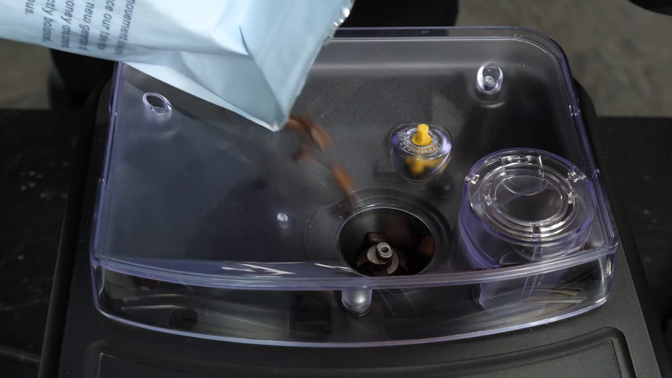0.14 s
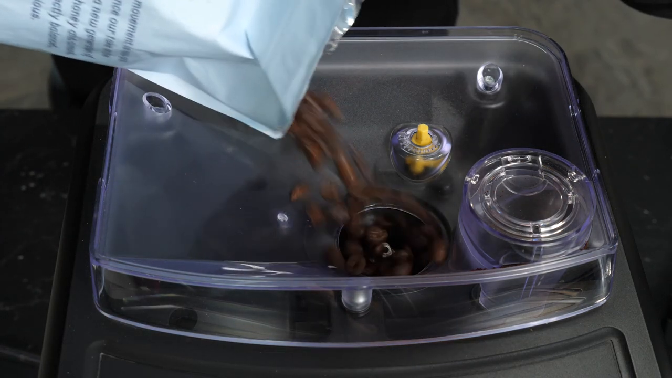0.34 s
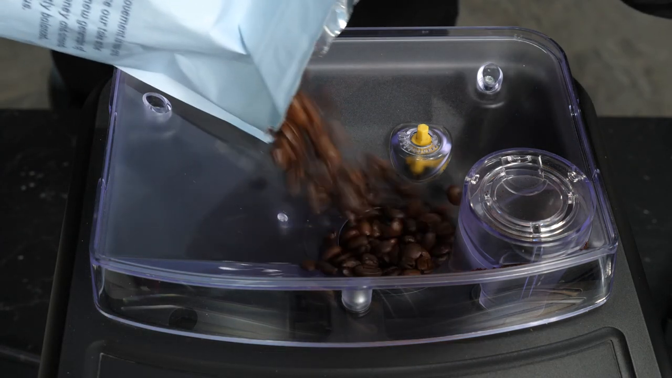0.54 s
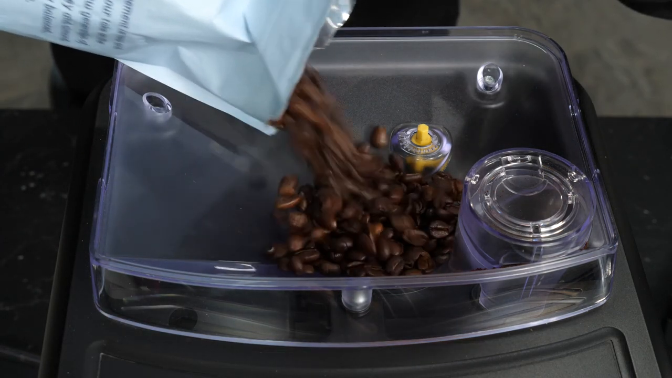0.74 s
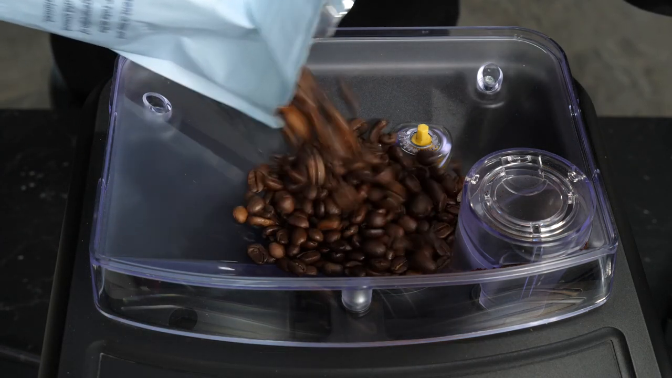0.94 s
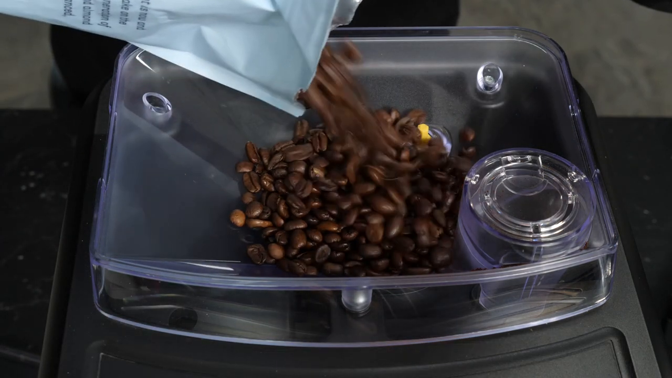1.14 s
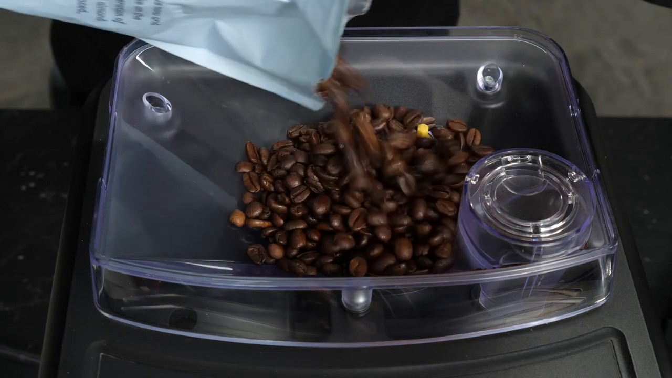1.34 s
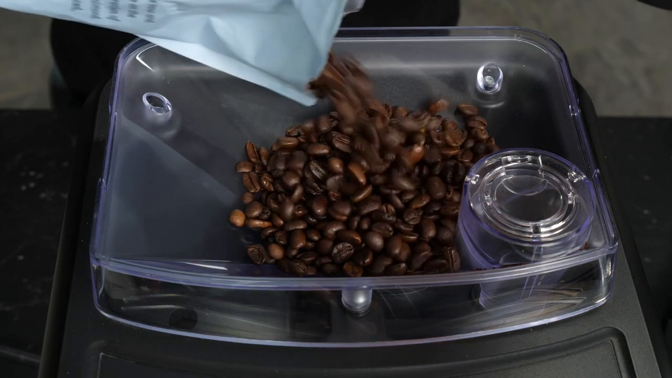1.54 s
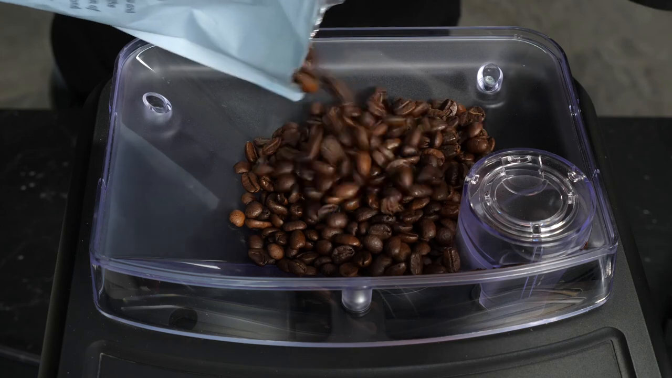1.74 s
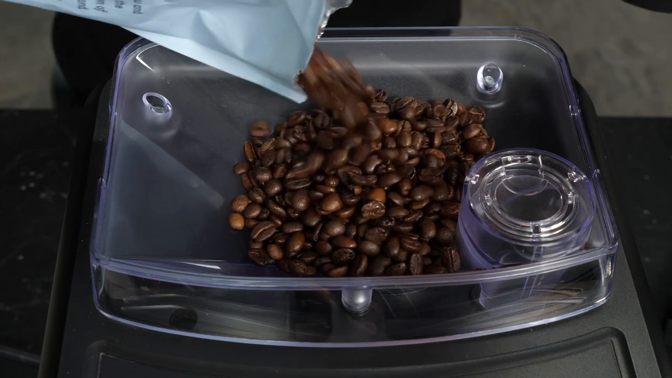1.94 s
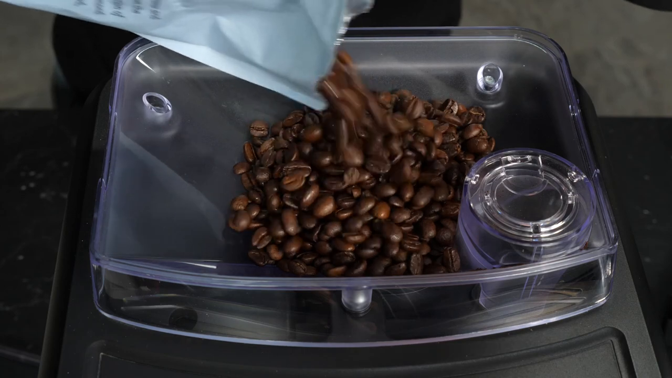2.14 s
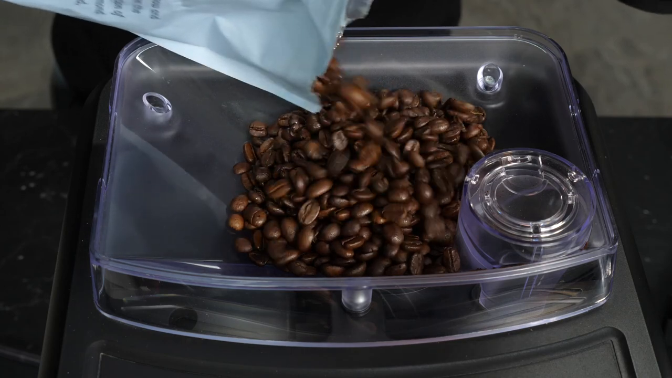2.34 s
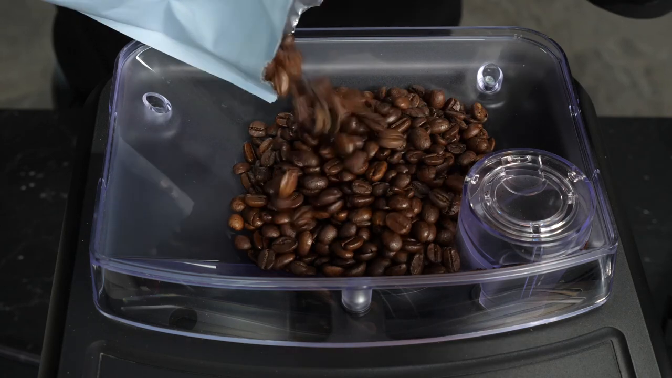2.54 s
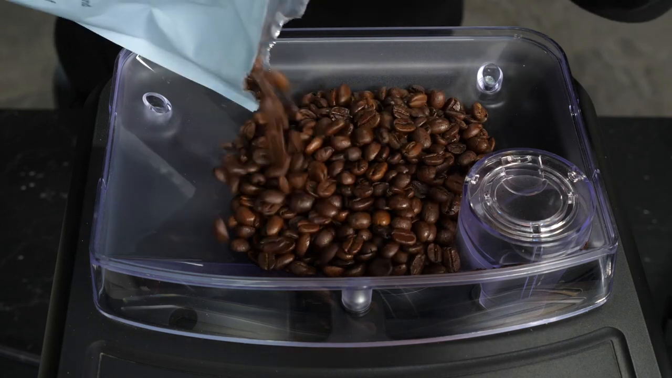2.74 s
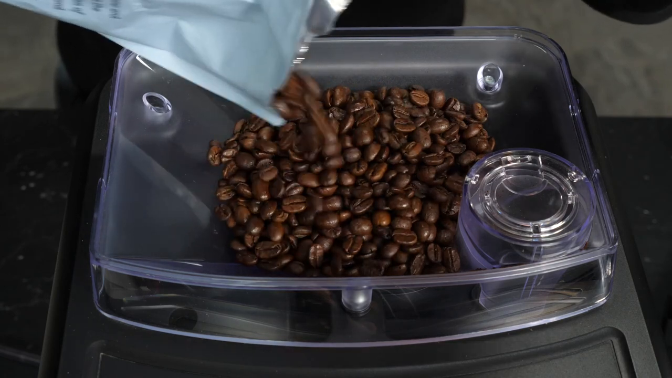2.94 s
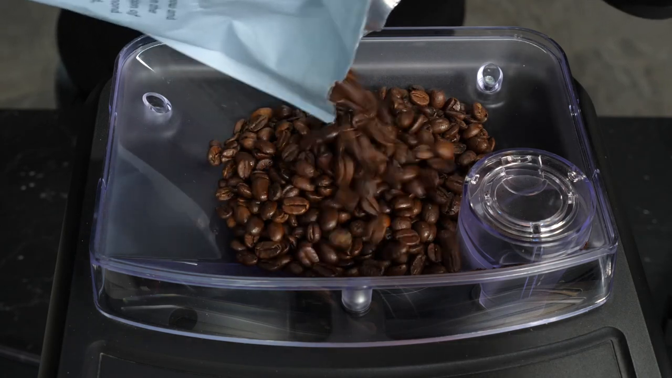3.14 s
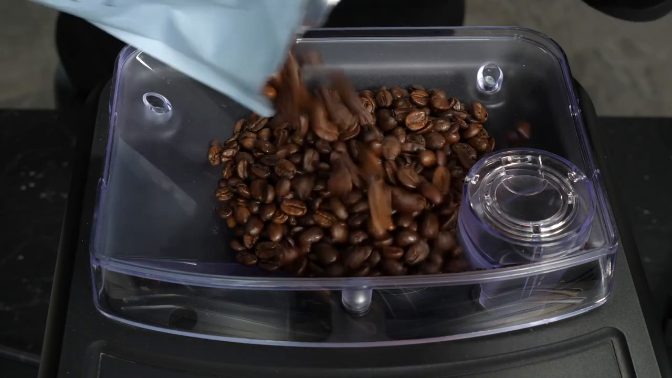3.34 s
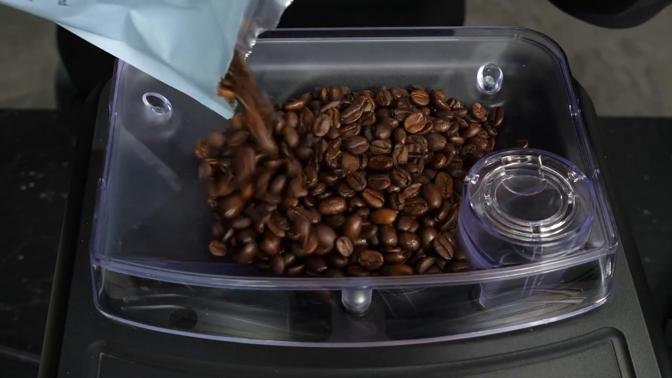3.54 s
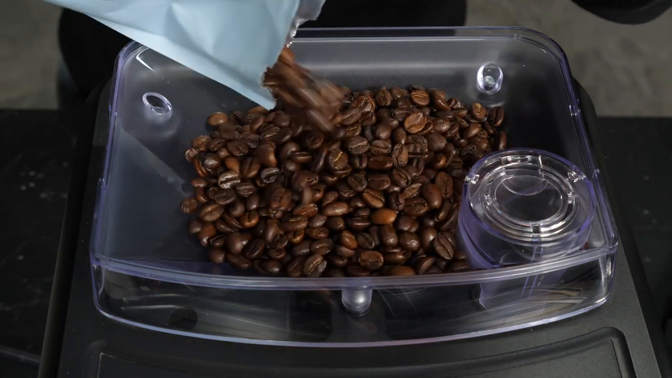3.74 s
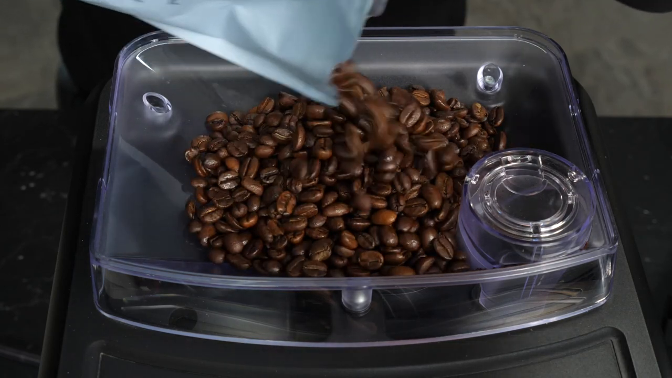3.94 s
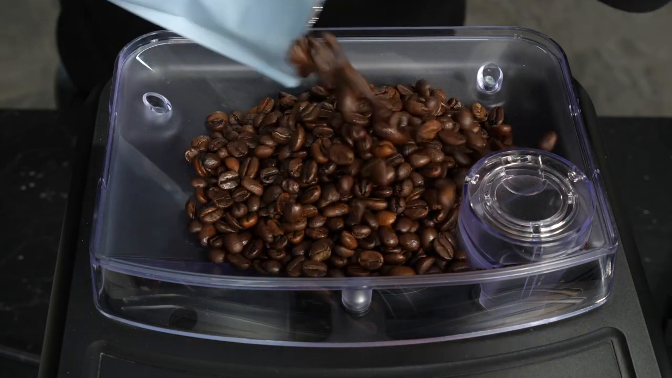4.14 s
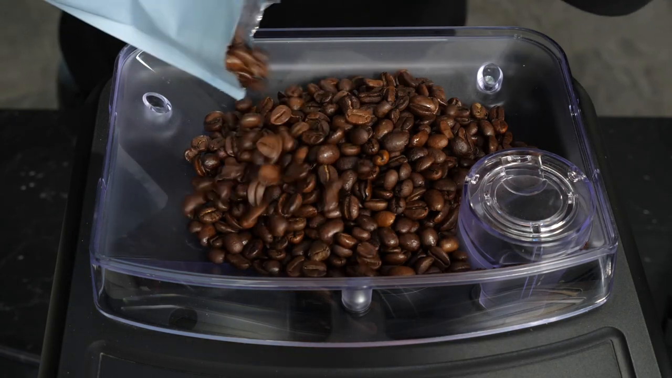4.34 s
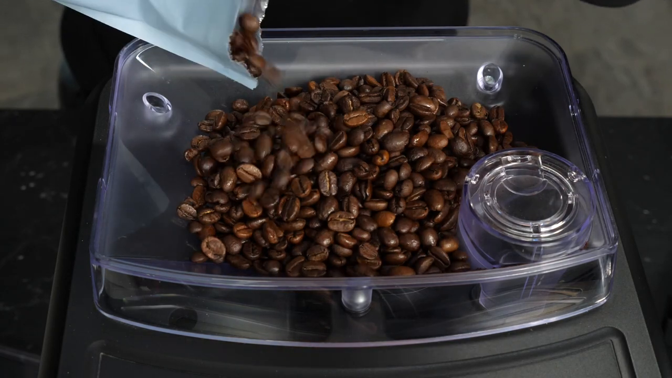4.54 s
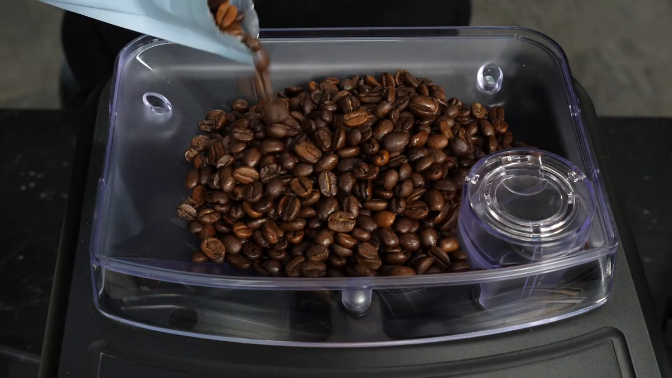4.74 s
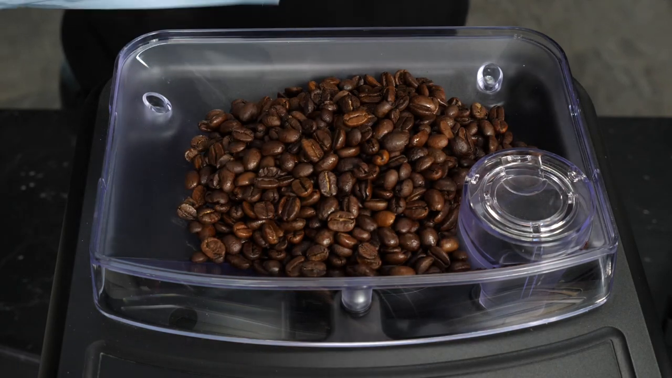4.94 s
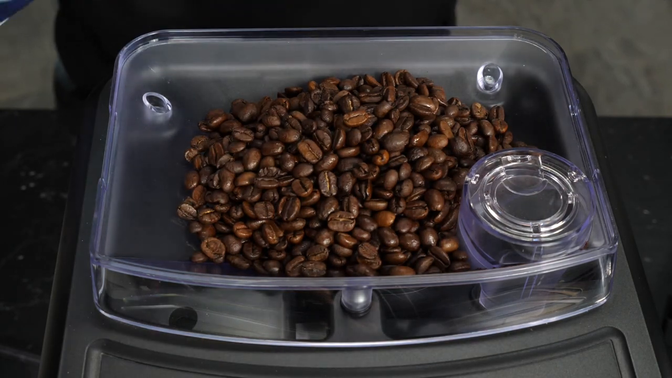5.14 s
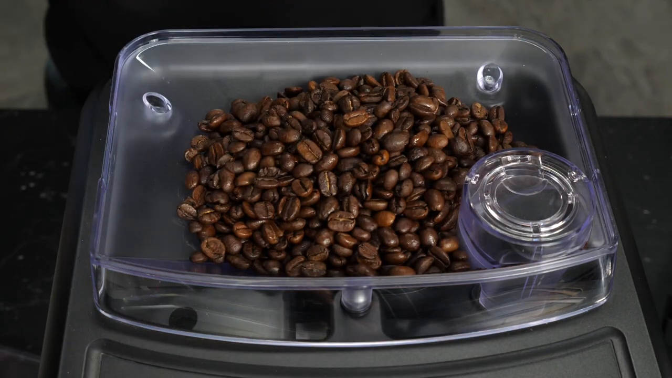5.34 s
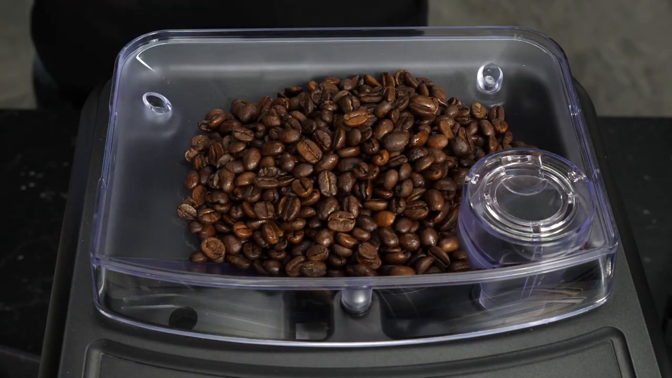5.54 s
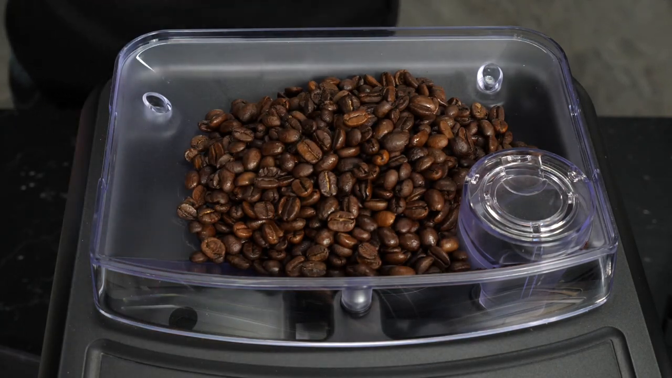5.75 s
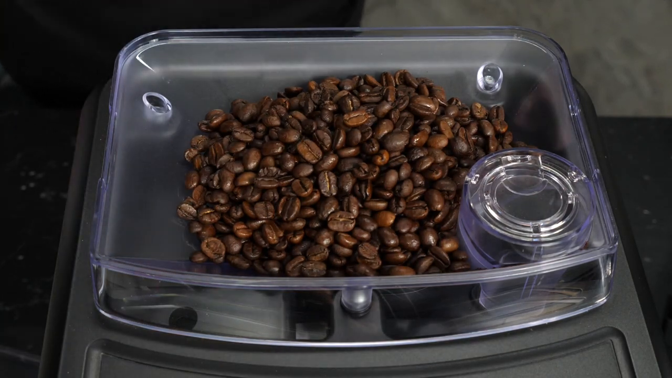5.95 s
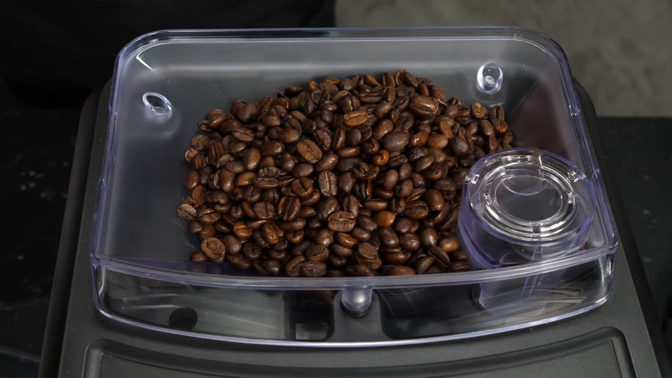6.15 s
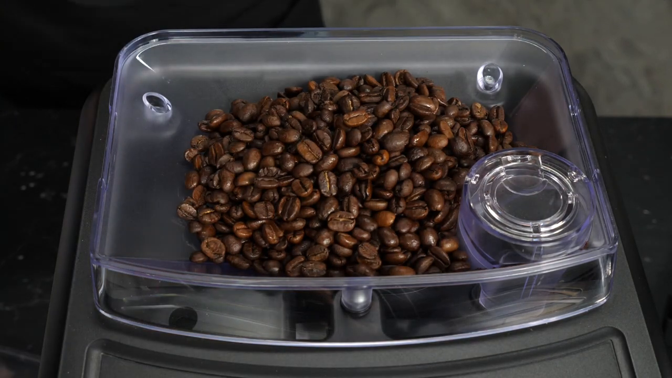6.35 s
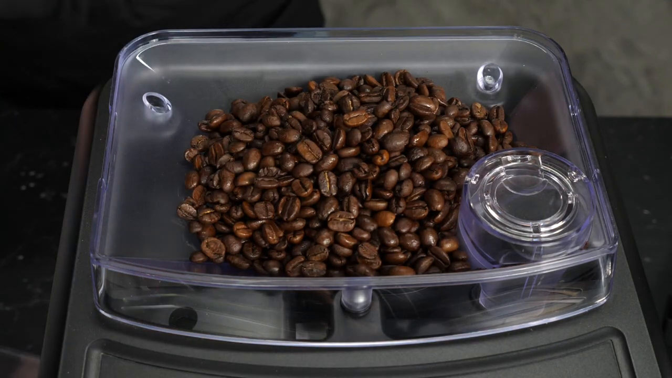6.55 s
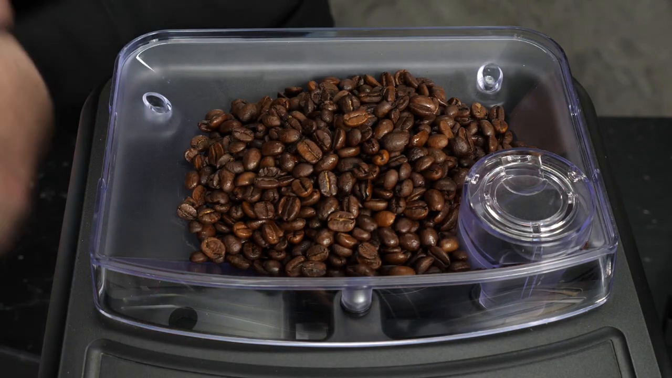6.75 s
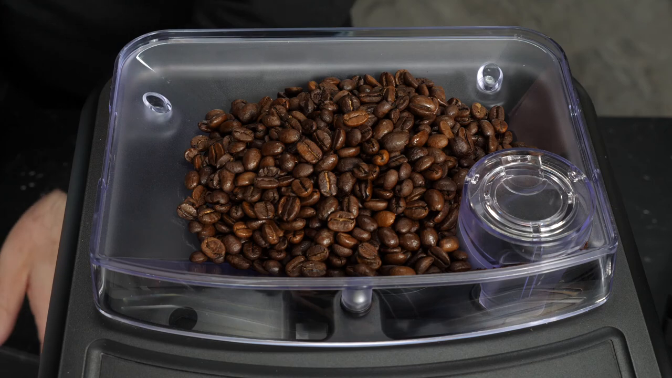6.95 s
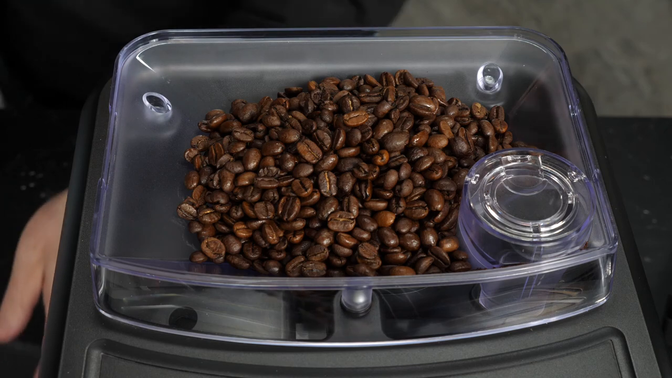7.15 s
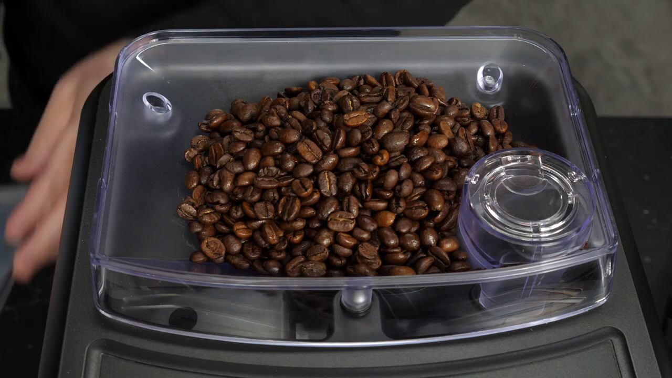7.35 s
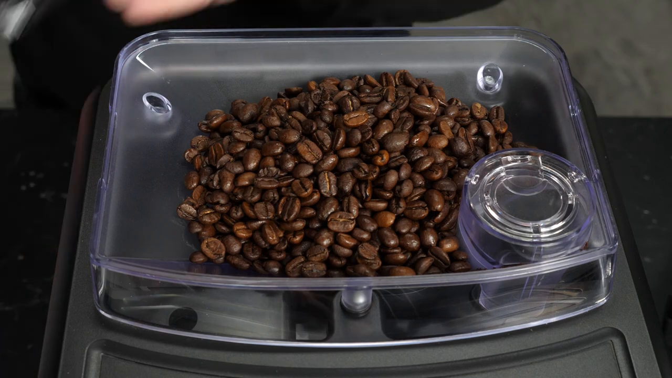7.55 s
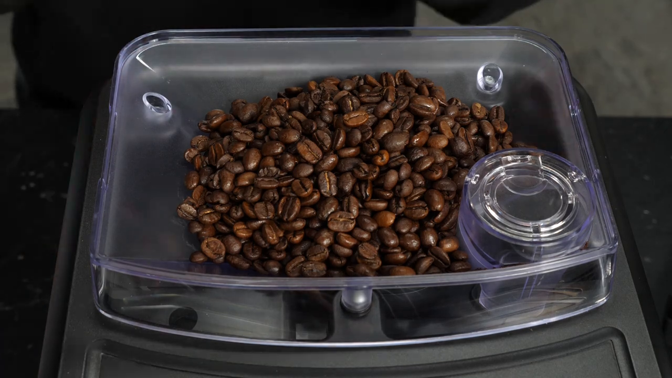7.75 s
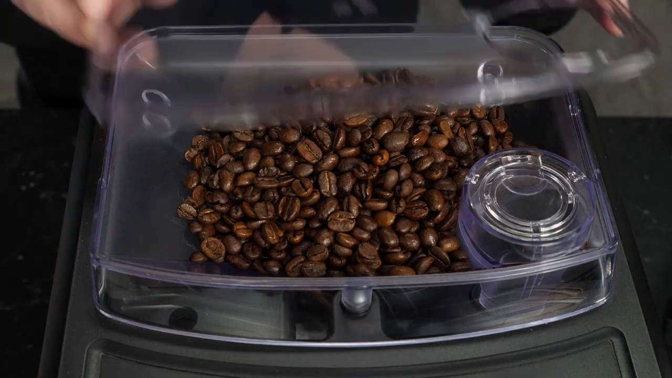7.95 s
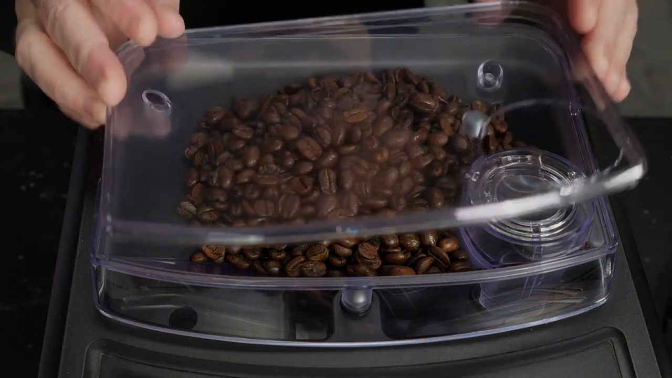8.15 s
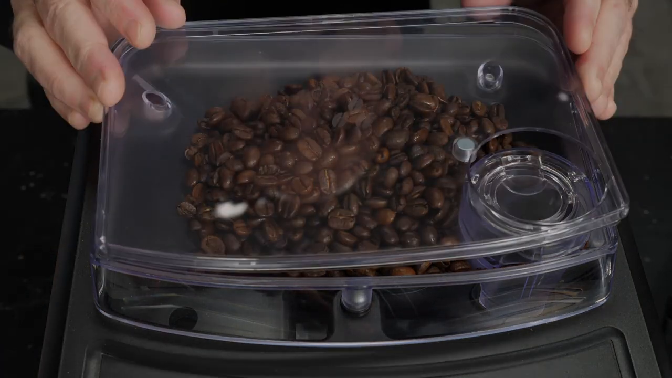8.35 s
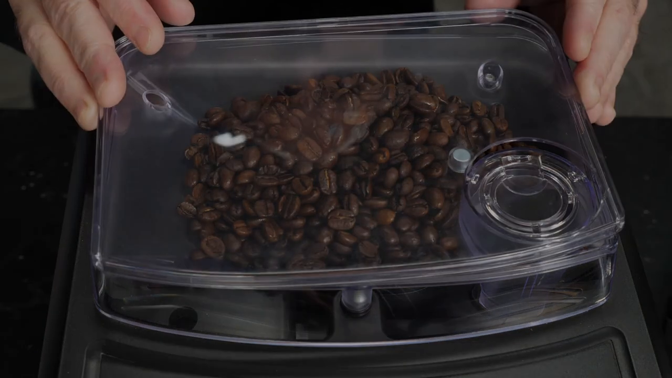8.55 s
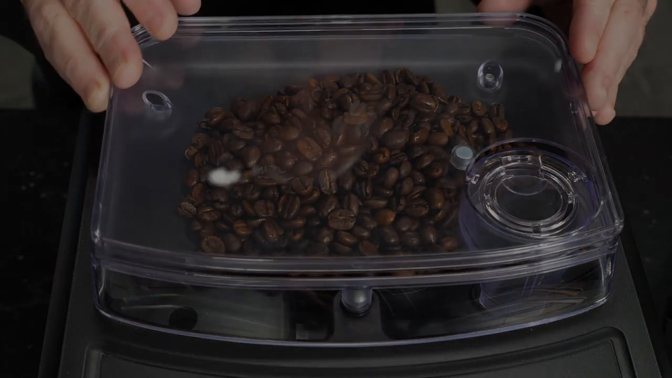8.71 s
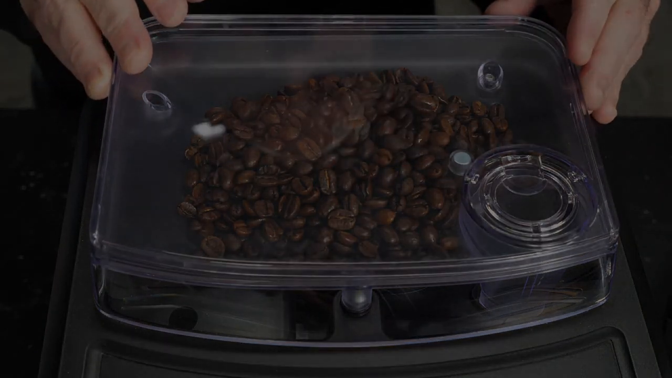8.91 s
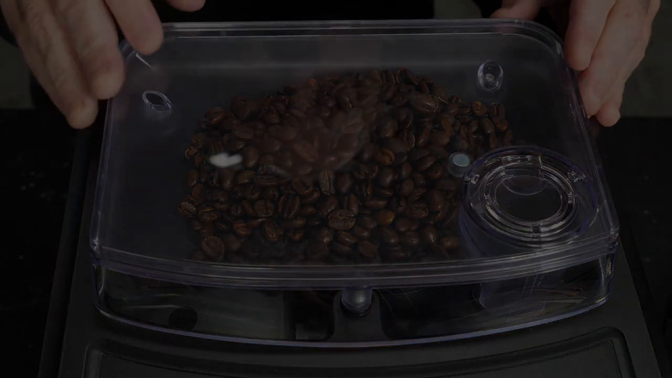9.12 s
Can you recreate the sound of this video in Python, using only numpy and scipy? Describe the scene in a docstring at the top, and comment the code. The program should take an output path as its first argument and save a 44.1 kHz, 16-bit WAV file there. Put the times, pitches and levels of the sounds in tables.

```python
"""Roasted coffee beans pour from a foil bag into a plastic hopper, close by in a quiet kitchen.
Random blows excite filtered noise splinters for heap thuds, shell ticks and wall rattle; some beans ring the hopper.
The stream thins to single ticks; the bag is tipped upright, its beans slump back crackling and it is set down.
A plastic lid is dragged off the counter in stick-slip grains and seated on the hopper with a few knocks.
Below lie a low shake of the machine and steady noise of kitchen air and microphone hiss."""
import sys
import numpy as np
from scipy import signal
from scipy.io import wavfile
from scipy.ndimage import uniform_filter1d

SR = 44100
rng = np.random.default_rng(int(sys.argv[2]) if len(sys.argv) > 2 else 0)


def put_to_file(sound):
    """Save the sound as 16-bit audio at rate SR, in the file named by the first command-line argument."""
    columns = np.atleast_2d(sound).T  # one column per channel
    safe = np.clip(columns, -1, 1)
    whole_steps = np.round(safe * 32767)
    wavfile.write(sys.argv[1], SR, whole_steps.astype(np.int16))


N = 409248  # samples

# crack of foil and plastic: (frequency [Hz], level [dB])
CRACK_SPECTRUM = [(1500, -15), (2600, -0.5), (3300, -0.5), (4100, 1.5), (5500, -4), (7500, -10.5),
                  (9500, -35.5)]
# fine crackle of foil and plastic: (frequency [Hz], level [dB])
FINE_SPECTRUM = [(6000, -19), (8000, -4), (10000, -6.5), (12200, -1.1), (14000, -4.5)]
# lid on the rim of the hopper: (frequency [Hz], level [dB])
SEAT_SPECTRUM = [(59, -42), (100, -25), (195, -8.5), (263, 8), (376, -11), (645, -4), (845, -11),
                 (1000, -10), (1390, -7.5), (1560, -16), (1720, -15.5), (3000, -29.5), (3900, -59),
                 (6600, -120)]


def amp(db):
    """Gain of a level in dB."""
    return 10 ** (np.asarray(db) / 20)


def evened(x):
    """Scaled to rms 1."""
    return x / np.sqrt(np.mean(x ** 2) + 1e-20)


def along(rows, column):
    """One column of a curve at every sample; -150 dB outside it."""
    rows = np.array(rows)
    return np.interp(np.arange(N) / SR, rows[:, 0], rows[:, column], left=-150, right=-150)


def colour(points, size=4096):
    """Causal impulse response of a spectrum: the phase is the Hilbert transform of the log gain."""
    point_hz, point_db = np.transpose(points)
    hz = abs(np.fft.fftfreq(size, 1 / SR))
    gain_db = np.interp(np.log(hz + 1), np.log(point_hz + 1), point_db, left=-70, right=-70)
    log_gain = gain_db * np.log(10) / 20
    response = np.fft.ifft(np.exp(np.conj(signal.hilbert(log_gain)))).real
    return response[:size // 2]


def through(x, points):
    """x coloured by a spectrum."""
    return signal.oaconvolve(x, colour(points))[:len(x)]


def burst(ms):
    """A splinter of noise dying with time constant ms."""
    t = np.arange(1500) / SR
    return rng.standard_normal(len(t)) * np.exp(-1000 * t / ms)


def impacts(per_s, spread_db):
    """Sparse blows at random moments; most are small, a few large."""
    size_db = spread_db * np.minimum(rng.exponential(1, N), 3.5)
    return amp(size_db) * (rng.random(N) < per_s / SR)


def grains(blows, points, ms, bed_db, count=12, stretch=0.044):
    """Every blow lands on one of several spots, each with its own splinter and tuning; far blows blur into a bed."""
    spot = rng.integers(0, count, N)
    tuning = np.exp(stretch * rng.uniform(-1.03, 1, count))
    near = np.zeros(N)
    for k in range(count):
        splinter = evened(through(burst(ms), np.multiply(points, [tuning[k], 1])))
        near += signal.oaconvolve(blows * (spot == k), splinter)[:N]
    bed = evened(through(rng.standard_normal(N), points))
    return evened(evened(near) + amp(bed_db) * bed)


def surges(depth_db, ms):
    """Beans come in clumps: a random gain that wanders within about ms."""
    width = max(int(ms * SR / 1000), 2)
    return amp(depth_db * evened(uniform_filter1d(rng.standard_normal(N), width)))


def swells(rows, column, rise_db, fall_db_per_s):
    """Gain curve of events that climb by rise_db, hold and die away at a steady rate."""
    t, out = np.arange(N) / SR, np.zeros(N)
    for row in rows:
        start, rise_s, hold_s = row[:3]
        top = start + rise_s
        below_db = rise_db * np.maximum(top - t, 0) / rise_s
        below_db += fall_db_per_s * np.maximum(t - top - hold_s, 0)
        out += amp(row[column] - below_db) * (t >= start)
    return out


def add(mix, s, db, sound):
    """Lays a sound into mix at a peak level, starting a fixed short lag after its listed time."""
    lag_s = .0013
    part = mix[round((s + lag_s) * SR):][:len(sound)]
    part += amp(db) * sound[:len(part)] / abs(sound).max()


def rings(rows, rise_ms, overtone, overtone_db):
    """One damped note a row, with an overtone at a given multiple."""
    out, t = np.zeros(N), np.arange(5000) / SR
    for s, db, hz, t60 in rows:
        note = np.sin(2 * np.pi * hz * t)
        note += amp(overtone_db) * np.sin(2 * np.pi * (overtone * hz * t + rng.random()))
        add(out, s, db, note * (1 - np.exp(-1000 * t / rise_ms)) * amp(-60 * t / t60))
    return out


def bounced(x, ms, db):
    """A bean hits, hops and hits again more softly."""
    return x + amp(db) * np.roll(x, int(ms * SR / 1000))


def hits(rows, body, edge, snap, push_db, push_hz, push_ms):
    """Each blow is a snap and a burst in the body, a shorter crack and edge, and a low push through the counter."""
    out, t = np.zeros(N), np.arange(6000) / SR
    sag = 1 + 1.3 * np.exp(-t / 0.0068)  # the push starts quick and slows to push_hz
    push = np.sin(2 * np.pi * push_hz * np.cumsum(sag) / SR) * np.exp(-1000 * t / push_ms)
    for s, body_db, crack_db, edge_db, ms in rows:
        add(out, s, body_db, signal.oaconvolve(burst(ms) + snap * burst(0.21), body))
        add(out, s, crack_db, through(burst(.5 * ms) + snap * burst(0.14), CRACK_SPECTRUM))
        add(out, s, edge_db, through(burst(0.56 * ms), edge))
        add(out, s, body_db + push_db, push)
    return out


def kitchen_air():
    """Steady coloured noise of kitchen air and microphone hiss."""
    # (frequency [Hz], level [dB])
    air_spectrum = [(8.8, -53.5), (15, -1), (30, -13), (48, -17), (70, -7.5), (125, -4.5), (144, -12.5),
                    (320, -18), (359, -17), (439, -23), (655, -25.5), (848, -26), (2060, -35),
                    (8610, -39.5), (14000, -38)]
    return amp(-65) * evened(through(rng.standard_normal(N), air_spectrum))


def machine_shake():
    """The body of the machine shakes under the stream and the bag: low noise on a level curve."""
    # (time [s], level [dB])
    shake_levels = [(0.0, -70), (0.15, -46.5), (1.67, -50.5), (4.4, -52.5), (4.91, -59.5), (6.23, -52),
                    (6.35, -67), (6.6, -66)]
    # (frequency [Hz], level [dB])
    rumble_spectrum = [(7.1, -35.5), (12, 10), (38, 0.5), (91, -20), (150, -19), (200, -44), (330, -120)]
    return evened(through(rng.standard_normal(N), rumble_spectrum)) * amp(along(shake_levels, 1))


def kitchen(x):
    """Room reverberation from sparse taps of random sign; the treble dies sooner."""
    size = SR // 2
    taps = np.zeros(size)
    at = np.arange(200, size - 20, 20)
    taps[at + rng.integers(0, 20, len(at))] = rng.choice([-1., 1.], len(at))
    hz, t, z = signal.stft(taps, SR, nperseg=256)
    t60_s = np.interp(hz, [300, 2000, 12000], [.35, .25, .12])[:, None]
    tail = signal.istft(z * amp(-60 * t / t60_s), SR, nperseg=256)[1]
    return signal.fftconvolve(x, tail / np.linalg.norm(tail))[:N]


def lid_modes():
    """Impulse response of the lid: a sum of damped sines."""
    # (frequency [Hz], level [dB], t60 [s])
    mode_rows = [(265, -5.5, .07), (470, -2, 0.038), (832, 0.5, 0.053), (1380, -8, 0.027),
                 (1650, -10, 0.035)]
    t = np.arange(4000) / SR
    return sum(amp(db - 60 * t / t60) * np.sin(2 * np.pi * hz * t) for hz, db, t60 in mode_rows)


def lid_rubs():
    """Stick-slip grains excite the lid, first on the counter, then on the rim, where its modes ring."""
    # (start [s], rise [s], hold [s], ring [dB], scrape [dB], fine hiss [dB])
    rub_rows = [(7.01, 0.03, .002, -46.5, -60, -68), (7.148, 0.014, 0.052, -54, -73, -76),
                (7.25, 0.02, 0.032, -62.5, -68, -66.5), (8.234, 0.0041, 0.0018, -48.5, -82, -90),
                (8.395, .003, 0.037, -49.5, -67, -83), (8.462, 0.0046, 0.0097, -34.5, -49, -61),
                (8.65, 0.026, 0.033, -57, -93, -93), (8.79, 0.032, .002, -43.5, -58, -61),
                (8.97, 0.07, .002, -45, -58, -67)]
    # lid on the counter: (frequency [Hz], level [dB])
    drag_spectrum = [(88, -46.5), (150, -3), (274, -17.5), (389, -29), (512, -1), (710, -13), (1170, -3),
                     (2060, -14), (2580, -28), (3000, -18.5), (3900, -29), (6600, -120)]
    on_rim_s, rise_db, ring_fall_db_per_s, hiss_fall_db_per_s = 8, 20.5, 320.0, 448
    slips = impacts(1800, spread_db=5.5)
    ring_gain = swells(rub_rows, 3, rise_db, ring_fall_db_per_s)
    scrape_gain = swells(rub_rows, 4, rise_db, hiss_fall_db_per_s)
    fine_gain = swells(rub_rows, 5, rise_db, hiss_fall_db_per_s)
    drag = grains(slips, drag_spectrum, ms=1.3, bed_db=-1.5)
    seat = grains(slips, SEAT_SPECTRUM, ms=4.0, bed_db=-2.5)
    seat += 0.83 * evened(signal.oaconvolve(slips - slips.mean(), lid_modes())[:N])
    ring = ring_gain * np.where(np.arange(N) < on_rim_s * SR, drag, evened(seat))
    scrape = grains(slips, CRACK_SPECTRUM, ms=1.0, bed_db=-5.0) * scrape_gain
    fine = grains(slips, FINE_SPECTRUM, ms=.8, bed_db=2.0) * fine_gain
    return ring + scrape + fine


def lid_chirps():
    """The lid chirps as it catches on the counter: short damped notes."""
    # (time [s], peak [dB], pitch [Hz], t60 [s])
    chirp_rows = [(7.037, -37.5, 1157, 0.037), (7.053, -47, 1200, 0.048), (7.206, -46, 1180, 0.053),
                  (7.224, -52, 1190, 0.064), (7.292, -44, 1024, 0.048)]
    return rings(chirp_rows, rise_ms=2.5, overtone=3, overtone_db=-22)


def lid_knocks():
    """The lid knocks: bursts excite the rim colour and the lid modes."""
    # (time [s], body peak [dB], crack peak [dB], sharp edge peak [dB], body burst time constant [ms])
    knock_rows = [(8.208, -44.5, -71, -57, 4.6), (8.234, -34, -54, -75, 2.5), (8.361, -41, -72, -70, 1.8),
                  (8.394, -36.5, -43, -46, 5.7), (8.415, -32.5, -43, -54, 4.9), (8.443, -49, -50, -66, 2.5),
                  (8.463, -24.5, -34, -26, 4.1), (8.502, -27.5, -51, -54, 3.3), (8.522, -32, -62, -64, 2.1),
                  (8.609, -47, -74, -84, 2.2), (8.734, -45.5, -77, -77, 4.3), (8.801, -48, -63, -47, 2.2),
                  (8.821, -29, -35.5, -32, 9.3), (8.975, -53, -64, -53, 2.1), (8.987, -41, -57, -40, 4.6),
                  (9.007, -40, -55, -46, 1.7), (9.029, -27.5, -37, -32, 4.3)]
    # sharp edge of a knock on plastic: (frequency [Hz], level [dB])
    edge_spectrum = [(5000, -29), (6800, 0), (9000, -5), (12300, 1), (14000, -4)]
    modes = lid_modes()
    rim = np.pad(colour(SEAT_SPECTRUM), (0, len(modes)))[:len(modes)]
    body = evened(rim) + 0.65 * evened(modes)
    return hits(knock_rows, body, edge_spectrum, snap=1.9, push_db=-16.5, push_hz=30.6, push_ms=33)


def counter_bumps():
    """The bag, and last the lid, bump the counter: bursts in its body, with a dull edge."""
    # (time [s], body peak [dB], crack peak [dB], edge peak [dB], body burst time constant [ms])
    bump_rows = [(5.297, -42, -21.5, -33, 2.7), (5.755, -23, -34, -61, 3.6), (5.817, -25.5, -35, -45, 2.2),
                 (5.844, -24, -62, -69, 1.6), (5.889, -30, -51, -55, 2), (5.921, -36, -56, -46, 3.6),
                 (5.994, -35, -44, -51, 3.3), (6.02, -21.5, -24, -32.5, 1.8), (6.046, -15.5, -29, -50, 6.3),
                 (6.061, -20.5, -27, -49, 9.1), (6.1135, -27.5, -27, -57.5, 3.4),
                 (6.212, -22.5, -20.5, -38, 2.5), (6.237, -31, -54, -62.5, 1.3),
                 (6.372, -46.5, -70, -80, 4.8), (6.405, -24.5, -26, -42, 10.8),
                 (6.542, -33, -46.5, -67, 3.6), (6.789, -49.5, -81, -65, 3.8),
                 (7.173, -28.5, -42.5, -64, 2.1)]
    # counter body: (frequency [Hz], level [dB])
    counter_spectrum = [(55, -28), (170, -5), (650, 1), (1300, -4.5), (2200, -8), (3200, -37),
                        (5000, -69.5)]
    # edge of a bump: (frequency [Hz], level [dB])
    dull_edge_spectrum = [(5500, -21.5), (7800, -1), (11000, -9), (14000, -10.5)]
    return hits(bump_rows, colour(counter_spectrum), dull_edge_spectrum,
                snap=3.84, push_db=-24.5, push_hz=45, push_ms=18)


def bag():
    """Beans slide back in a dense mass against the crackling foil and shift again as the bag is set down."""
    # slump into the upright bag: (time [s], body level [dB])
    slump_rows = [(4.97, -64), (5.05, -41), (5.145, -40), (5.21, -27.5), (5.25, -32), (5.296, -26.5),
                  (5.41, -28), (5.56, -29.5), (5.69, -33.5), (5.8, -49.5), (5.87, -62)]
    # (start [s], rise [s], hold [s], body [dB], foil crackle [dB], fine crackle [dB])
    shift_rows = [(5.79, 0.024, 0.0074, -59, -59, -61), (5.875, 0.0077, .04, -55, -64.5, -62),
                  (5.935, 0.024, 0.019, -48.5, -56.5, -57), (6.018, 0.017, 0.023, -36, -41, -54),
                  (6.11, 0.02, 0.045, -52.5, -62, -69), (6.165, 0.016, 0.011, -49.5, -63, -65),
                  (6.21, 0.0016, 0.017, -41, -54.5, -61)]
    # beans in the bag: (frequency [Hz], level [dB])
    bag_spectrum = [(59, -41.5), (100, -16.5), (157, -18.5), (301, -15.5), (538, -6), (729, 0.5), (868, -4),
                    (1060, 0), (1690, -10), (1980, -10), (3200, -30), (4160, -47.5), (7040, -120)]
    rise_db, body_fall_db_per_s, crackle_fall_db_per_s = 16.5, 329.5, 447
    blows = impacts(1500 * surges(depth_db=4, ms=15), spread_db=2)
    slump_db = along(slump_rows, 1)
    # the crackle swells more steeply than the body
    body_gain = amp(slump_db) + swells(shift_rows, 3, rise_db, body_fall_db_per_s)
    foil_gain = amp(-8.5 + 1.184 * slump_db) + swells(shift_rows, 4, rise_db, crackle_fall_db_per_s)
    fine_gain = amp(-11.0 + 1.213 * slump_db) + swells(shift_rows, 5, rise_db, crackle_fall_db_per_s)
    body = grains(blows, bag_spectrum, ms=2.9, bed_db=-4, count=24, stretch=0.14) * body_gain
    foil = grains(blows, CRACK_SPECTRUM, ms=2.7, bed_db=-4.0) * foil_gain
    fine = grains(blows, FINE_SPECTRUM, ms=0.9, bed_db=-4.0) * fine_gain
    return body + foil + fine


def pour():
    """Falling beans rattle the wall and tick on each other; the heap answers with its own thuds."""
    # stream: (time [s], heap thud [dB], bean tick [dB], wall rattle [dB])
    stream_rows = [(0.0, -38, -57, -50), (.08, -46, -57, -59.5), (.15, -40, -57, -48.5),
                   (.33, -39, -34.5, -39.5), (.71, -38.5, -34, -37), (1.3, -43.5, -42.5, -49.5),
                   (1.85, -44, -45.5, -54), (2.3, -45, -51.5, -56.5), (2.44, -43, -44.5, -50.5),
                   (2.63, -45, -52, -61.5), (2.77, -41.5, -45, -48.5), (2.9, -49, -53, -55.5),
                   (3.03, -44.5, -54, -58), (3.1, -43, -52, -56.5), (3.38, -41.5, -42, -48),
                   (3.75, -44.5, -49, -54), (4.0, -44.5, -53, -57.5), (4.14, -40.5, -44.5, -49),
                   (4.45, -47.5, -51, -56), (4.62, -51, -57, -66.5), (4.84, -59, -64, -67.5),
                   (5.0, -60, -82, -68)]
    # loudest single beans: (time [s], tick peak [dB], rattle peak [dB])
    bean_rows = [(0.1377, -23.5, -31), (0.178, -24.5, -31), (0.21, -23, -42), (0.244, -25.5, -32),
                 (0.2928, -20.5, -30), (0.3143, -24, -32), (0.4147, -24, -29), (0.5737, -16, -27),
                 (1.1315, -22, -37), (1.242, -24, -38), (1.3906, -31, -52), (1.575, -36, -49),
                 (1.862, -31, -54), (1.929, -34, -51), (1.9924, -34.5, -53), (2.0237, -35, -51),
                 (2.0672, -44, -57), (2.175, -28, -57), (2.222, -31, -53), (2.498, -36, -54),
                 (2.6961, -26.5, -32.5), (2.764, -27, -30), (2.7922, -32, -28), (2.9188, -27.5, -34),
                 (3.1655, -32, -26), (3.2136, -39, -32.5), (3.34, -33, -35), (3.3566, -34, -26.5),
                 (3.436, -28, -28), (3.5273, -42, -29.5), (3.6537, -25, -33), (3.6635, -30, -29.5),
                 (3.7808, -36, -54), (3.8242, -27, -56), (4.135, -27, -28.5), (4.2006, -32, -44),
                 (4.2432, -26.5, -50), (4.3252, -34.5, -38), (4.4446, -26.5, -34), (4.4942, -33, -37),
                 (4.567, -36, -55), (4.6793, -41, -55), (4.7242, -37, -34.5), (4.785, -47, -47),
                 (4.793, -40, -60), (4.802, -37, -65), (4.8315, -40, -59)]
    # single beans that make the hopper ring: (time [s], peak [dB], pitch [Hz], t60 [s])
    hollow_rows = [(.158, -25.5, 573, 0.027), (.248, -23.5, 470, 0.018), (.249, -24, 840, 0.025),
                   (.774, -25.5, 1150, 0.029), (.995, -39, 188, 0.026), (1.119, -36, 3360, .017),
                   (1.2, -30.5, 3300, 0.01), (1.221, -40, 3280, .017), (1.451, -38.5, 3370, .017),
                   (1.52, -27, 1550, 0.0056), (2.42, -33, 720, 0.045), (2.654, -35.5, 228, 0.021),
                   (2.846, -32, 690, 0.021), (3.165, -36.5, 1840, 0.018), (4.889, -37.5, 590, 0.013)]
    # heap and air of the hopper: (frequency [Hz], level [dB])
    thud_spectrum = [(71, -64), (120, -18), (146, -19), (256, -8.5), (382, -11), (682, 4), (929, -3),
                     (1080, -1.5), (1260, 0.5), (2600, -21.5), (3380, -21.5), (5720, -120)]
    # hopper wall: (frequency [Hz], level [dB])
    rattle_spectrum = [(880, -31), (1500, -11.5), (1700, 2), (1820, -1), (1990, 0.5), (2950, -6),
                       (3740, -4), (4080, -2.5), (5150, -4.5), (5790, -4.5), (7680, -11), (8500, -10),
                       (11000, -31.5), (18700, -120)]
    # hard bean shells: (frequency [Hz], level [dB])
    tick_spectrum = [(4410, -49), (7500, -23.5), (13000, -4.5), (14000, -5)]
    # shells on the bare plastic floor: (frequency [Hz], level [dB])
    bare_spectrum = [(4410, -20), (7500, -13.5), (9170, -2), (12400, -2), (13500, -6), (14000, 5)]
    cover_s, bean_thud_db = 1.48, -16  # time in which beans cover the floor; thud of a bean re its tick

    clumps = surges(depth_db=2.5, ms=25)
    blows = impacts(450 * clumps, spread_db=5.0)
    tumbles = impacts(400 * clumps, spread_db=1.5)
    bare = np.exp(-(np.arange(N) / SR / cover_s) ** 2)  # share of the floor still uncovered

    thud = grains(tumbles + 0.37 * blows, thud_spectrum, ms=3.37, bed_db=-3.0, count=32, stretch=0.15)
    thud *= amp(along(stream_rows, 1)) * surges(depth_db=1.5, ms=53)
    tick = np.sqrt(1 - bare) * grains(blows, tick_spectrum, ms=.5, bed_db=-9.5)
    tick += np.sqrt(bare) * grains(blows, bare_spectrum, ms=1.2, bed_db=-3)
    tick *= amp(along(stream_rows, 2))
    rattle = grains(0.31 * blows + tumbles, rattle_spectrum, ms=2.4, bed_db=-5, count=24, stretch=0.09)
    rattle *= amp(along(stream_rows, 3))
    out = thud + tick + rattle + rings(hollow_rows, rise_ms=1.1, overtone=1.5, overtone_db=-8.5)

    for s, shell_db, wall_db in bean_rows:
        shell_spectrum, ms = (bare_spectrum, .7) if s < cover_s else (tick_spectrum, .35)
        shell = bounced(burst(ms), rng.uniform(1.9, 3.0), db=-2.0)
        add(out, s, shell_db, through(shell, shell_spectrum))
        add(out, s, wall_db, through(burst(1.3), rattle_spectrum))
        add(out, s, shell_db + bean_thud_db, through(burst(2.9), thud_spectrum))
    return out


def scene():
    """Near sounds with their room, over the shake of the machine and the kitchen air."""
    lid = lid_rubs() + lid_chirps() + lid_knocks()
    near = pour() + bag() + lid + counter_bumps()
    room = amp(-15.5) * kitchen(near)
    return (near + room + machine_shake() + kitchen_air())[None]


def record(dry):
    """Band limit: a linear-phase low-pass."""
    edge_hz = 14120
    low_pass = signal.firwin(1023, edge_hz, window=("kaiser", 9), fs=SR)
    return signal.oaconvolve(dry, low_pass[None], "same")


dry = scene()
out = record(dry)
put_to_file(out)
```